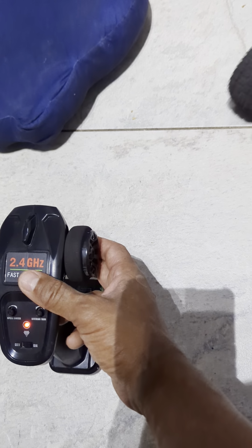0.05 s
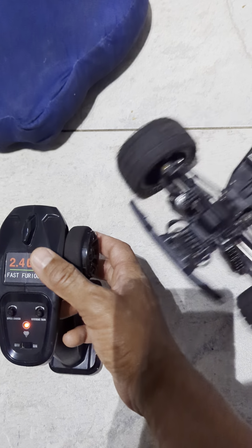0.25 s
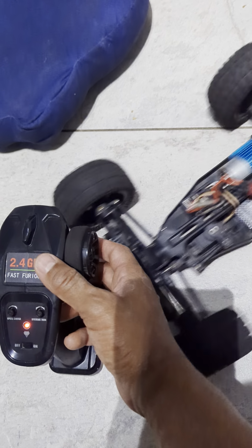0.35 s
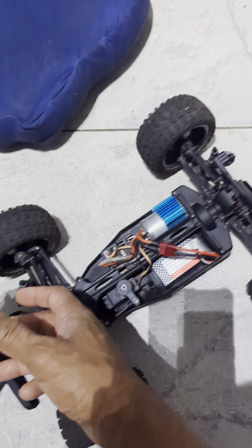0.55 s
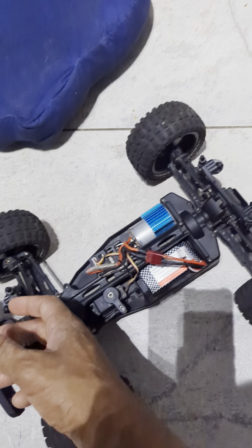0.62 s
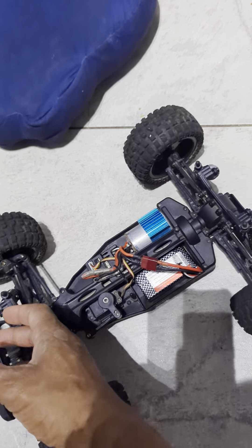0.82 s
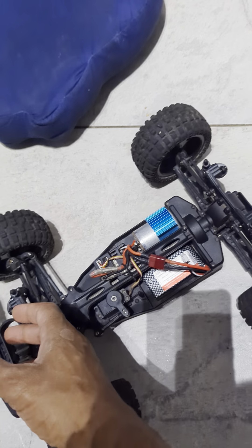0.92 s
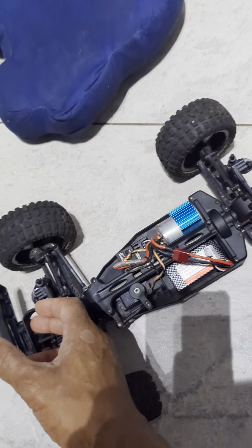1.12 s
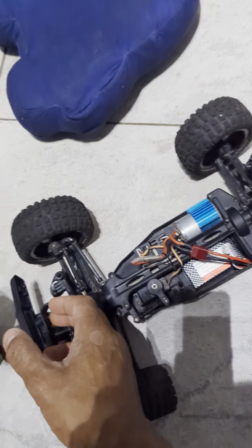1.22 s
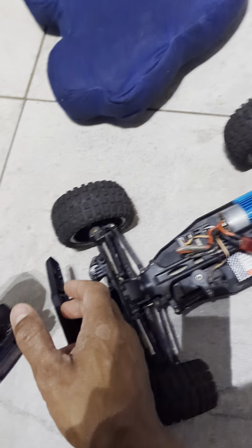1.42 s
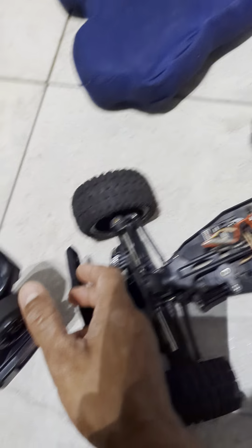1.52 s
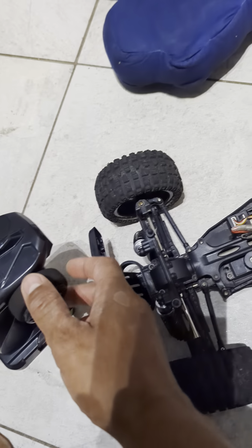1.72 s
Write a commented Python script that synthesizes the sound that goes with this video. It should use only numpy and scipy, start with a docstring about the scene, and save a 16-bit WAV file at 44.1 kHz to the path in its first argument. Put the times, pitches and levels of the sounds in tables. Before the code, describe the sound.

Plastic toy car rattles and clacks, then thuds down on a tiled floor.

```python
"""Over a low hum, the gears and loose plastic joints of a radio-controlled toy car start to rattle.
It is pulled across a tiled floor, close up: gears whirr, wheels knock, small parts clack and click.
As it is set down, the chassis slaps the tiles and thuds on its tyres; fingers brush the bumper.
The plastic is mostly tiny impacts coloured by the body; clacks and thuds are damped tones.
The hard room rings after each hit."""
import sys
import numpy as np
from scipy import signal
from scipy.fft import rfft, irfft
from scipy.io import wavfile

SR = 44100
rng = np.random.default_rng(int(sys.argv[2]) if len(sys.argv) > 2 else 0)


def unload_wav(signal):
    """Save mono or channel-first audio to the path in sys.argv[1] as 16-bit WAV at rate SR, clipped to [-1, 1]."""
    wavfile.write(
        sys.argv[1],
        SR,
        np.round(np.clip(np.atleast_2d(signal).T, -1, 1) * 32767).astype(np.int16),
    )


N = 77175

# room tone spectrum (f/Hz, level/dB) and stereo image (f/Hz, left-right likeness)
AIR_EQ = [(25, -55), (43, -11.5), (62, 0.5), (110, -3), (160, -8.5), (260, -6.5), (440, -14.5), (1700, -20),
          (2200, -24.5), (4900, -34.5), (8500, -37), (10000, -45.5), (12200, -38), (15500, -46)]
AIR_STEREO = [(100, 0.93), (300, 0.78), (1000, 0.16), (3000, 0.0483)]
# mains hum partials (f/Hz, level/dB)
MAINS_HUM = [(59, -58.5), (119, -50)]
AIR_DB, BED_PAN_DB = -46, -0.65

# envelope of the rattle as the car moves (t/s, level/dB)
RATTLE_ENVELOPE = [(0, -94), (0.037, -49), (0.059, -43.5), (0.115, -37.5), (0.171, -45.5), (0.214, -35.5),
                   (0.254, -37), (0.289, -48), (0.319, -37), (0.39, -41.5), (0.483, -41), (0.512, -25.5),
                   (.55, -25), (.615, -30.5), (.645, -32), (0.742, -34), (.83, -45), (0.898, -44.5),
                   (0.951, -91)]
TICKS_PER_S, TICK_SCATTER_DB = 5600, 2.5
# gear pitch as the wheels are nudged round and run down (t/s, f/Hz)
WHIRR_GLIDE = [(0.099, 1618), (0.289, 1900), (0.41, 1430), (0.599, 2050)]
WHIRR_DB, WHIRR_WIDTH_HZ = -9.5, 380
# broad colour of the chassis, and the body and gearbox resonances on top of it (f/Hz, level/dB)
CHASSIS_EQ = [(60, -18.5), (200, -8.5), (420, -7.5), (700, -6), (950, -5), (1500, -2), (2000, -3.5),
              (2500, -9.5), (4200, -15.5), (6500, -19), (8600, -16.5), (10000, -24.5), (12000, -16.5),
              (15500, -31)]
CHASSIS_PEAKS = [(535, 1), (1030, 10), (1700, 4.5), (1900, 8.5), (2120, -1), (3440, 4)]
PEAK_WIDTH_HZ = 54
RIPPLE_DB, RIPPLE_SPACING_HZ, RIPPLE_FROM_HZ = 2, 109.65, 3500
# stereo image of the plastic (f/Hz, left-right likeness)
CAR_STEREO = [(1000, 0.62), (2000, 0.23), (5000, 0.017)]

# suspension and wheel knocks (t/s, level/dB, length/s, snap relative to the knock/dB)
WHEEL_KNOCKS = [(0.096, -29.5, 0.0062, -6.5), (0.2445, -31, 0.0093, -5.5), (0.49, -22, 0.0079, -15.5),
                (0.519, -20, 0.013, -17), (0.586, -22, 0.0038, -5.5), (0.654, -23.5, 0.011, -9),
                (0.828, -30, 0.0038, -23)]
CONTACT_T60_S, CONTACT_SCATTER_DB = 0.026, 2.17
# bright snap of hard plastic on tile (f/Hz, level/dB)
SNAP_EQ = [(150, -9.5), (600, 4), (1800, -1), (3000, 7.5), (5200, -1), (8100, 6), (9300, 0), (12500, 0.5),
           (15500, 6.5)]
# hollow clacks of loose parts (t/s, level/dB, f/Hz)
PART_CLACKS = [(0.2446, -26.5, 1099), (0.311, -16, 1706), (0.35, -24.5, 1420), (0.52, -12, 1550),
               (.528, -10, 1740), (0.541, -18, 1710), (.572, -12.5, 1960), (.5855, -7.5, 2055),
               (.616, -8, 1764), (0.6542, -20.5, 1020), (0.727, -12, 1775), (.794, -29.5, 1112),
               (.914, -33.5, 1048)]
CLACK_T60_AT_1KHZ_S, CLACK_ATTACK_S = 0.054, 0.0013
REBOUND_S, REBOUND_LOSS_DB, REBOUND_OCTAVES = .003, 4.5, .15
# soft bumps on the tyres (t/s, level/dB) and the modes they ring (f/Hz, level/dB, T60/s)
TYRE_BUMPS = [(0.259, -12.5), (0.521, -11), (0.679, 5), (.699, 0), (.79, -11), (0.863, -17.5),
              (0.882, -12.5)]
THUD_MODES = [(96.8, -29, 0.23), (155.7, -30, 0.21), (224.4, -28, 0.22), (285.4, -25, 0.1),
              (335, -25, 0.072), (414, -39, .14), (526.1, -32.5, 0.13)]
BUMP_ATTACK_S, THUD_LOW_CUT_HZ = 0.0015, 95.4
# sharp clicks of small parts, plus the bright crack and high ring of the chassis hitting the floor
# (t/s, level/dB, length/s, f/Hz, width/octaves)
CLICKS_AND_CRACK = [(0.299, -32.5, 0.0018, 5600, 0.34), (0.308, -36.5, 0.0032, 6390, 0.14),
                    (0.4887, -25.5, 0.0066, 2900, 0.48), (0.678, -12.5, .0012, 10300, 0.96),
                    (0.694, -33, 0.016, 7800, .22), (0.811, -35.5, 0.01, 10100, 0.99),
                    (1.3, -53.5, 0.0024, 9000, 0.9)]
# tyre rumble, then a faint hand rustle (peak t/s, width/s, level/dB, f/Hz, width/octaves)
RUB_SWELLS = [(0.751, 0.14, -42, 66.4, 0.67), (1.581, 0.16, -58, 1180, 0.72)]
# chassis hits on the floor (t/s, level/dB)
FLOOR_SLAPS = [(0.679, -7.5), (0.6794, -12), (0.6835, -10.5)]
SLAP_T60_S, SHIVER_DB, SHIVER_T60_S = 0.012, -18.5, 0.4
# colour of fingers on the bumper (f/Hz, level/dB)
BRUSH_EQ = [(150, 12.5), (600, 8.5), (1050, -3), (2200, 1), (4500, -0.5), (7000, 1), (12500, 8), (14500, 0)]
BRUSH_PEAK_S, BRUSH_WIDTH_S, BRUSH_DB = .915, 0.0096, -34.5

# reverb decay (f/Hz, T60/s) and stereo image (f/Hz, left-right likeness)
ROOM_DECAY = [(150, 1), (1000, 0.36), (5000, 0.39), (15000, 0.25)]
ROOM_STEREO = [(150, 0.95), (500, 0.8), (1200, 0), (3000, 0)]
PLASTIC_SEND_DB, THUD_SEND_DB, PREDELAY_S = -6, -11.5, 0.0035
TOP_HZ = 15850


def amp(db):
    """Decibels to gain."""
    return 10 ** (np.asarray(db) / 20)


def unit(x):
    """Scale to rms 1."""
    return x / np.sqrt(np.mean(x ** 2) + 1e-20)


def clock():
    """Time of each sample."""
    return np.arange(N) / SR


def freqs():
    """Frequencies of the padded spectrum."""
    return np.fft.rfftfreq(2 * N, 1 / SR)


def curve(points, hz):
    """Read (f/Hz, value) points on a log frequency axis."""
    f, values = np.transpose(points)
    return np.interp(np.log(hz + 1), np.log(f + 1), values)


def bell(hz, width_hz):
    """Bell of height 1 around a frequency."""
    return 1 / (1 + (2 * (freqs() - hz) / width_hz) ** 2)


def band(hz, octaves):
    """EQ in dB of a broad band around a pitch."""
    return -20 * np.log10(1 + (np.log2((freqs() + 1) / hz) / octaves) ** 2)


def swell(peak_s, width_s):
    """Gaussian fade in and out."""
    return np.exp(-.5 * ((clock() - peak_s) / width_s) ** 2)


def filtered(x, response):
    """Apply a frequency response."""
    return irfft(rfft(x, 2 * N) * response, 2 * N)[..., :N]


def colour(x, eq_db):
    """Minimum-phase EQ of unit energy: it rings only after a hit."""
    cepstrum = irfft(np.log(unit(amp(eq_db))))
    cepstrum[1:N] *= 2
    cepstrum[N + 1:] = 0
    return filtered(x, np.exp(rfft(cepstrum)))


def spread(pair, likeness):
    """Turn two unrelated signals into left and right of a given likeness."""
    angle = np.arccos(np.clip(curve(likeness, freqs()), -1, 1)) / 2
    mid, side = filtered(pair, np.array([np.cos(angle), np.sin(angle)]))
    return np.array([mid + side, mid - side])


def contacts(start, length, t60=CONTACT_T60_S):
    """A gritty burst of tiny impacts that holds for a moment and dies."""
    t = clock() - start
    envelope = (t >= 0) * amp(-60 * np.maximum(t - length, 0) / t60)
    grit = np.repeat(amp(CONTACT_SCATTER_DB * rng.standard_normal(N)), 16)[:N]
    burst = envelope * grit * rng.standard_normal((2, N))
    return unit(burst) * np.sqrt(np.mean(envelope ** 2))


def ring(start, hz, t60, attack):
    """One damped vibration."""
    t = clock() - start
    alive = (t > 0) & (t < 2 * t60)
    t, out = t[alive], np.zeros(N)
    envelope = amp(-60 * t / t60) * (1 - np.exp(-t / attack))
    out[alive] = envelope * np.sin(2 * np.pi * (hz * t + rng.random()))
    return out


def room_tone():
    """A bed of low steady noise and mains hum."""
    noise = filtered(rng.standard_normal((2, 2 * N)), amp(curve(AIR_EQ, freqs())))
    air = unit(spread(noise, AIR_STEREO))
    hum = sum(amp(db) * np.sqrt(2) * np.sin(2 * np.pi * (hz * clock() + rng.random()))
              for hz, db in MAINS_HUM)
    return amp(AIR_DB) * air + hum


def chassis(x):
    """The plastic body lends its broad colour and narrow resonances to whatever shakes it."""
    peaks_db = sum(db * bell(hz, PEAK_WIDTH_HZ) for hz, db in CHASSIS_PEAKS)
    return colour(x, curve(CHASSIS_EQ, freqs()) + peaks_db)


def treble_ripple(x):
    """The many small resonances of loose parts put random peaks and dips in the top end."""
    ripple = np.interp(freqs() / RIPPLE_SPACING_HZ, np.arange(N), rng.standard_normal(N))
    return colour(x, RIPPLE_DB * (freqs() > RIPPLE_FROM_HZ) * ripple)


def rattle():
    """Gear teeth and loose joints tick into the chassis; the meshing gears add a rough, gliding whirr."""
    motion = amp(np.interp(clock(), *np.transpose(RATTLE_ENVELOPE)))
    ticks = (rng.random(N) < TICKS_PER_S / SR) * amp(TICK_SCATTER_DB * rng.standard_normal(N))
    joints = chassis(motion * unit(ticks * rng.standard_normal((2, N))))
    gear_hz = np.interp(clock(), *np.transpose(WHIRR_GLIDE))
    phase = 2 * np.pi * np.cumsum(gear_hz) / SR
    # low-passed noise smears the gear pitch into a band
    roughness = filtered(rng.standard_normal((2, 2, N)), bell(0, 2 * WHIRR_WIDTH_HZ) ** 2)
    whirr = unit(roughness[0] * np.cos(phase) + roughness[1] * np.sin(phase))
    return joints + amp(WHIRR_DB) * motion * whirr


def knocks():
    """Suspension and wheels knock the chassis, each hit with a bright snap on top."""
    body = sum(amp(db) * contacts(start, length) for start, db, length, _ in WHEEL_KNOCKS)
    snap = sum(amp(db + snap_db) * contacts(start, length) for start, db, length, snap_db in WHEEL_KNOCKS)
    return chassis(body) + colour(snap, curve(SNAP_EQ, freqs()))


def clacks():
    """A loose part hits its stop and rings, then chatters twice on its neighbours at nearby pitches."""
    out = np.zeros((2, N))
    for first_s, db, hz in PART_CLACKS:
        for bounce, (late, detune) in enumerate(rng.uniform(-0.928, 1, size=(3, 2))):
            start, pitch = first_s, hz
            if bounce:
                start += REBOUND_S * (bounce + late / 2)
                pitch *= 2 ** ((-1) ** bounce * REBOUND_OCTAVES * (1 + detune))  # below, then above
            t60 = CLACK_T60_AT_1KHZ_S * (1000 / pitch) ** 1.5  # higher parts die sooner
            pair = np.array([ring(start, pitch, t60, CLACK_ATTACK_S) for _ in range(2)])
            out += amp(db - bounce * REBOUND_LOSS_DB) * pair
    return out


def thuds():
    """The car's weight bumps on its rubber tyres; the deepest bass is cut away."""
    bumps = sum(amp(db + mode_db) * ring(start, hz, t60, BUMP_ATTACK_S)
                for start, db in TYRE_BUMPS for hz, mode_db, t60 in THUD_MODES)
    low_cut = signal.butter(2, THUD_LOW_CUT_HZ, "highpass", fs=SR, output="sos")
    return signal.sosfilt(low_cut, bumps)


def clicks_and_crack():
    """Pitched bursts: small parts click, and the chassis hits the floor with a crack and a high ring."""
    return sum(colour(amp(db) * contacts(start, length), band(hz, octaves))
               for start, db, length, hz, octaves in CLICKS_AND_CRACK)


def rubs():
    """Soft swells of friction: tyres on the tiles, then the hand on the body."""
    return sum(amp(db) * swell(peak_s, width_s) * unit(colour(rng.standard_normal(N), band(hz, octaves)))
               for peak_s, width_s, db, hz, octaves in RUB_SWELLS)


def slap():
    """The chassis cracks against the tiles in quick hits, and its parts shiver on."""
    hits = np.zeros((2, N))
    for start, db in FLOOR_SLAPS:
        crack = contacts(start, 0, SLAP_T60_S)
        shiver = amp(SHIVER_DB) * contacts(start, 0, SHIVER_T60_S)
        hits += amp(db) * (crack + shiver)
    return colour(hits, curve(SNAP_EQ, freqs()))


def brush():
    """Fingers slide over the bumper in one short swish."""
    stroke = amp(BRUSH_DB) * swell(BRUSH_PEAK_S, BRUSH_WIDTH_S)
    return colour(stroke * rng.standard_normal((2, N)), curve(BRUSH_EQ, freqs()))


def reverb(send):
    """The tail of a hard room, whose bass outlasts its treble."""
    hz, t, spectrum = signal.stft(rng.standard_normal((2, N)), SR, nperseg=256)
    decay = amp(-60 * t / curve(ROOM_DECAY, hz)[:, None])
    tail = signal.istft(spectrum * decay, SR, nperseg=256)[1][:, :N]
    tail = spread(tail * (clock() > PREDELAY_S), ROOM_STEREO)
    return signal.fftconvolve(send, tail / np.linalg.norm(tail[0]), axes=1)[:, :N]


def scene():
    """Wide plastic and centred thuds feed the reverb; room tone and rubs sit slightly right."""
    plastic = rattle() + knocks() + clacks() + clicks_and_crack() + slap() + brush()
    plastic = spread(treble_ripple(plastic), CAR_STEREO)
    tyres = thuds()
    echo = reverb(amp(PLASTIC_SEND_DB) * plastic + amp(THUD_SEND_DB) * tyres)
    bed = (room_tone() + rubs()) * amp([[BED_PAN_DB], [-BED_PAN_DB]])
    return plastic + tyres + echo + bed


def record(dry):
    """Clip at full scale and cut the very top."""
    return filtered(np.clip(dry, -1, 1), freqs() < TOP_HZ)


dry = scene()
out = record(dry)
unload_wav(out)
```